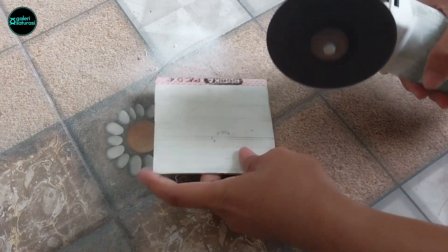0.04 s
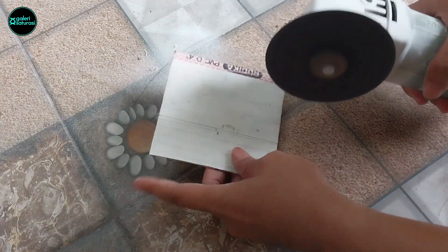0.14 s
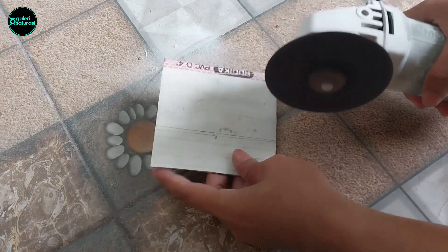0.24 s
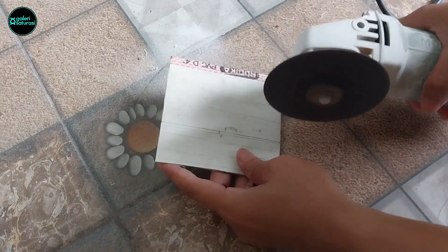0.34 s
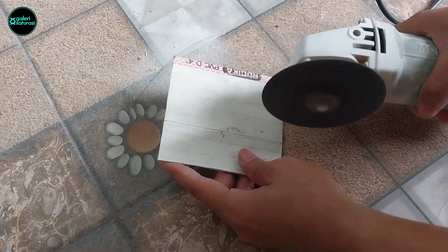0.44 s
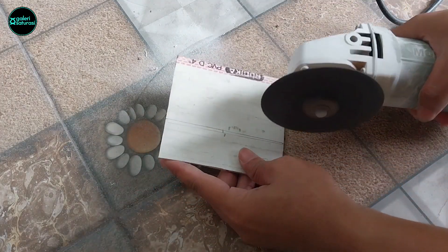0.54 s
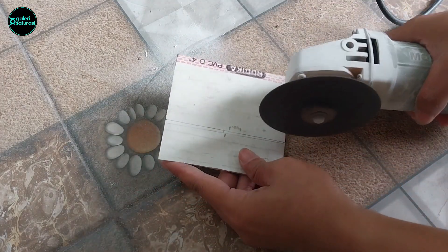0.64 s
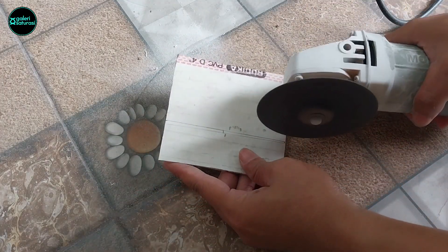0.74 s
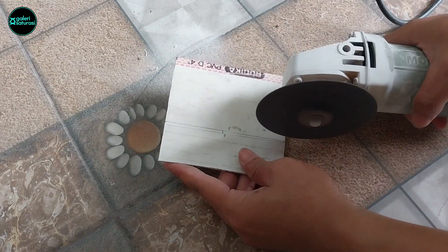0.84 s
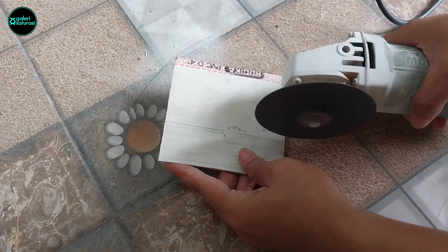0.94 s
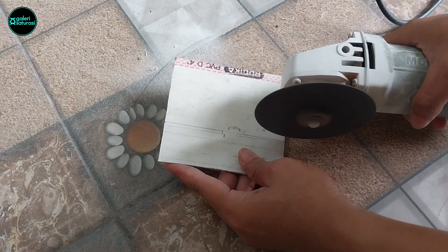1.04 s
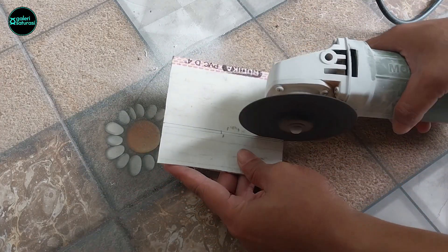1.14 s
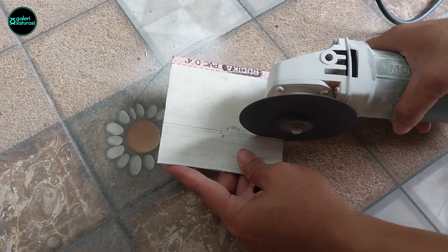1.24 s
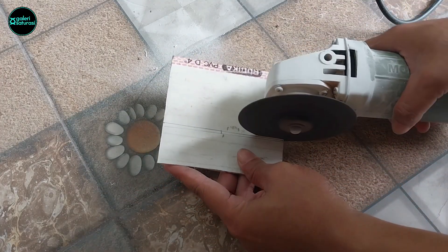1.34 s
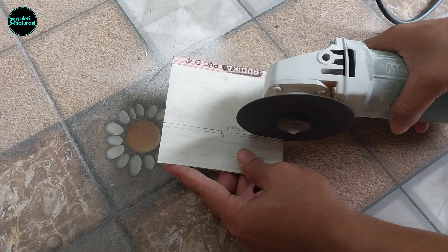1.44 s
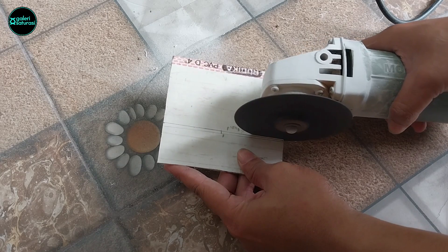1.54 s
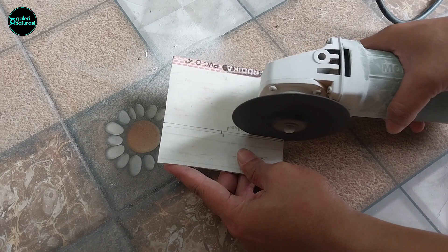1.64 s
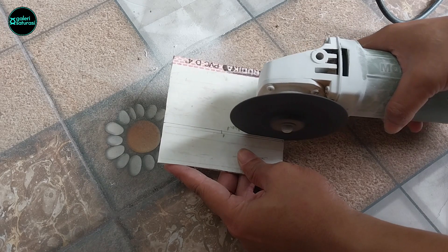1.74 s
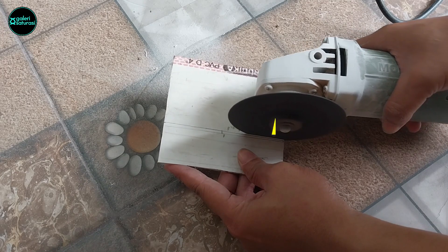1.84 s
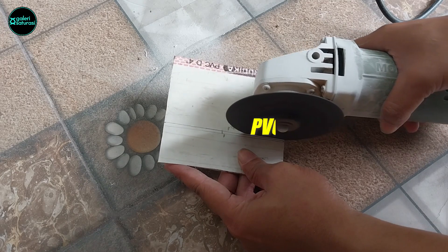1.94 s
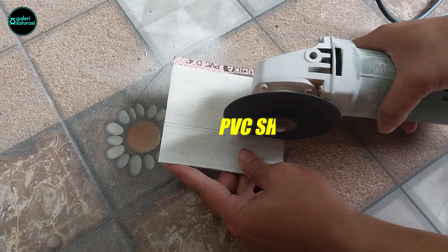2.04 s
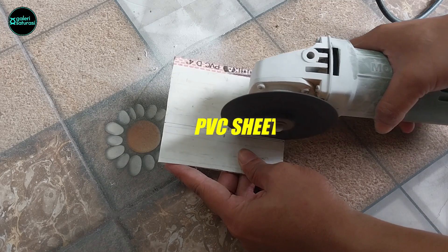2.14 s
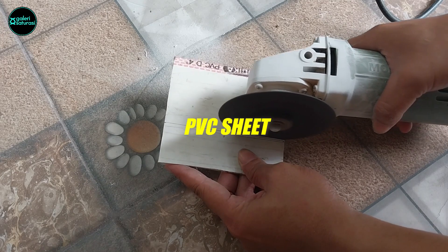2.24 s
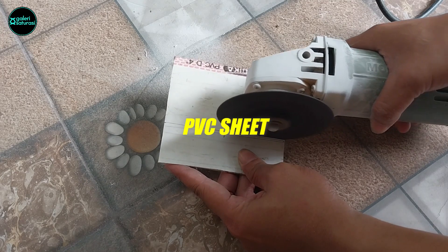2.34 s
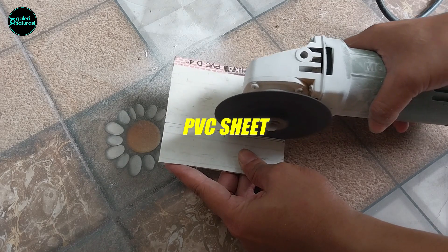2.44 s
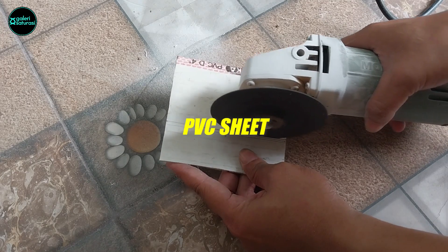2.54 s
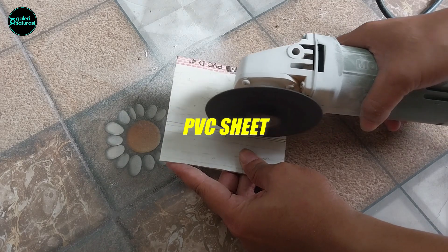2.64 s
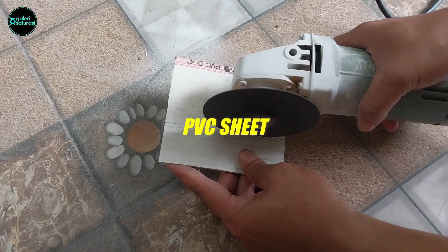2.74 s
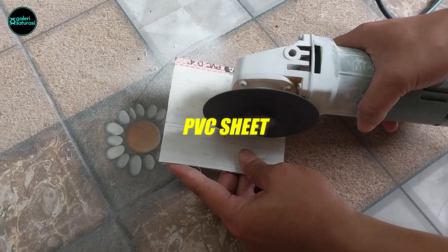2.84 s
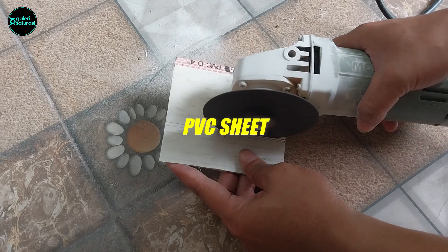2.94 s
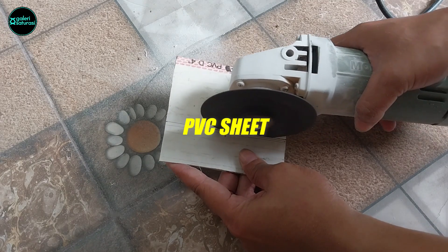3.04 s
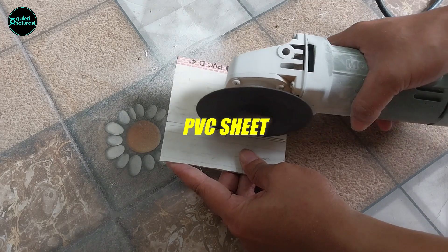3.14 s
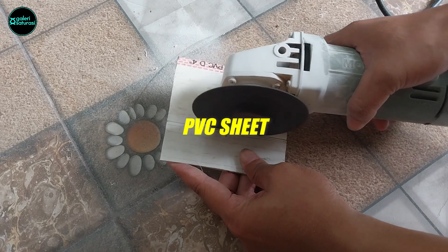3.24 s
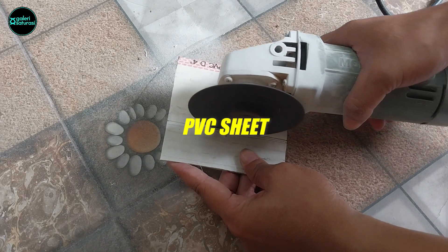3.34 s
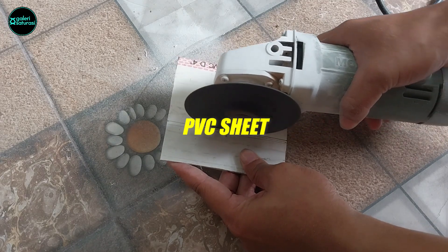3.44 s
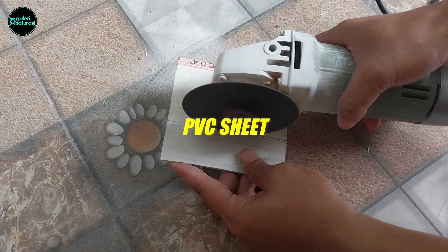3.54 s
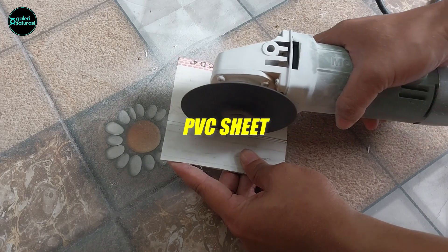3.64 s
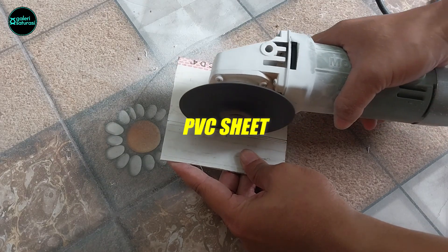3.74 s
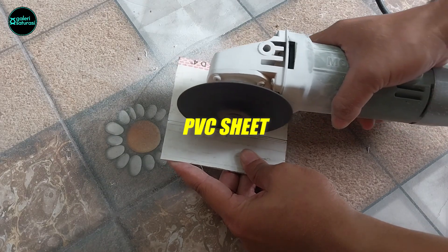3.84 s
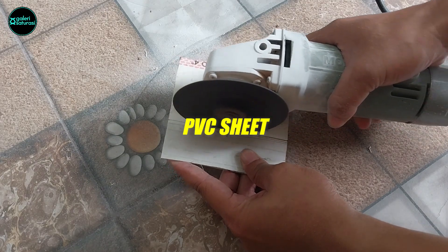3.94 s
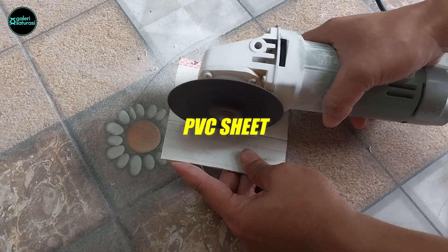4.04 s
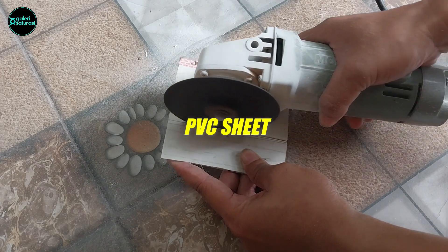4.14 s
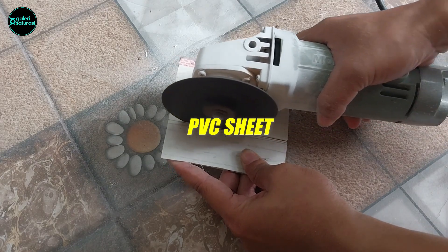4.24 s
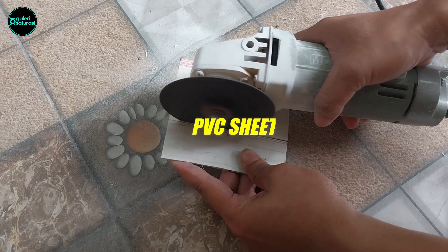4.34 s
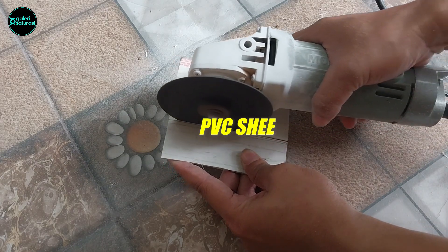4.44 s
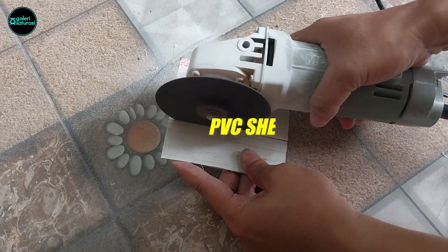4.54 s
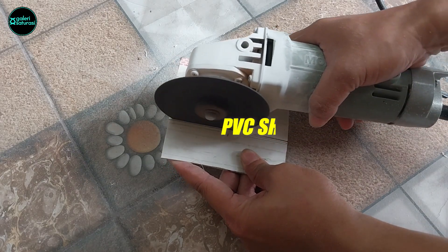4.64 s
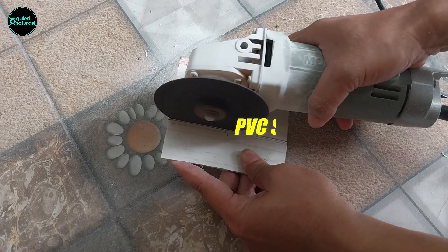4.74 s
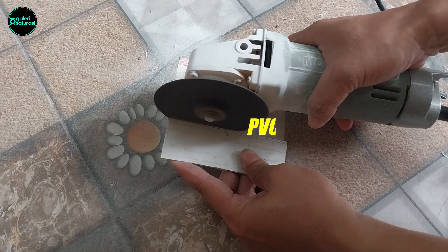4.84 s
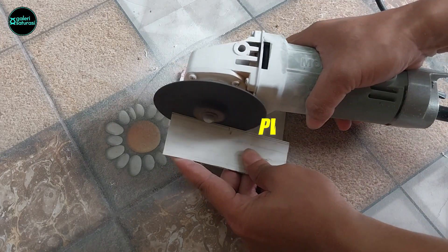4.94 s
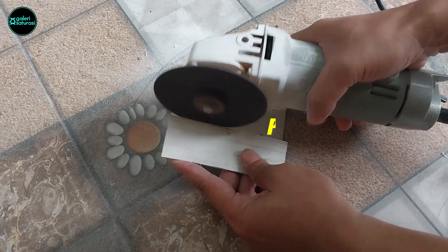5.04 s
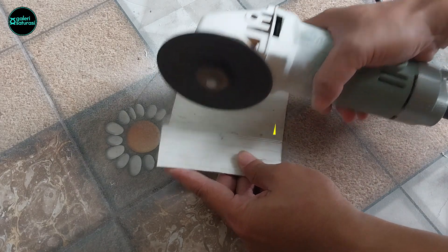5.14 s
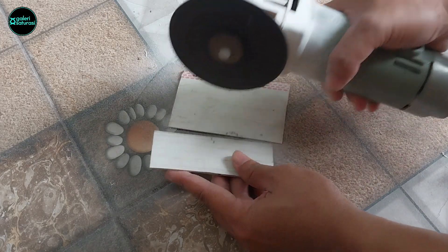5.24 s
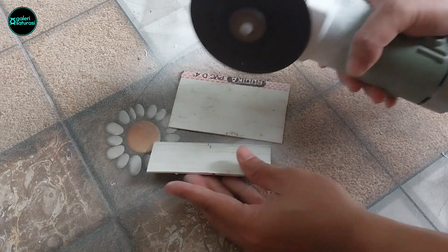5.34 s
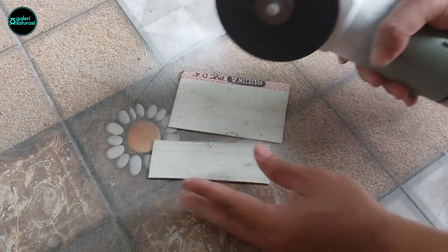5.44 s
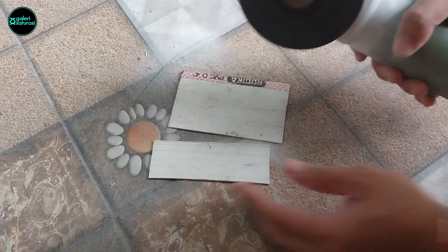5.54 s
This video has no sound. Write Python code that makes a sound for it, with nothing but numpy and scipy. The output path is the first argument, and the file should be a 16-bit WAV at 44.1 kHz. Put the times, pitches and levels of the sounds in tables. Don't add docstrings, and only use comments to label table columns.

```python
import sys
import numpy as np
from scipy import signal
from scipy.fft import rfft, irfft, next_fast_len
from scipy.io import wavfile
from scipy.ndimage import uniform_filter1d, map_coordinates

SR = 44100
rng = np.random.default_rng(int(sys.argv[2]) if len(sys.argv) > 2 else 0)


def level_to_linear(level):
    exponent = np.asarray(level, float) / 20
    return 10 ** exponent


def inscribe(sig):
    pcm = np.round(np.clip(np.atleast_2d(sig).T, -1, 1) * 32767)
    wavfile.write(sys.argv[1], SR, pcm.astype(np.int16))


N = 246519
T = np.arange(N) / SR

GEAR = 13 / 35
BITE_S, THROUGH_S, CLEAR_S = 1.1, 4.86, 5.1


def motor():
    # armature order, level in dB running up, biting, deep in the cut, lifted.
    order_lines = [(1, -38, -44, -54, -47), (2, -44, -46, -54, -48), (3, -33, -37, -44, -38.5),
                   (4, -50, -47, -45, -42), (12, -37, -43, -39, -52)]
    casing = {4: (1770, 230, -39), 12: (5630, 400, -34.5)}
    # frequency in Hz, level in dB per Hz.
    air_near = [(30, -58), (230, -15), (500, -10.5), (680, -8), (950, -5), (1200, -7), (2200, -12.5),
                (4600, -8.5), (5700, -10), (7000, -12.5), (8700, -20.5), (13000, -13), (15000, -19),
                (16500, -31)]
    # frequency in Hz, level in dB per Hz.
    air_lifted = [(30, -34), (230, -16), (900, -18), (2100, -12.5), (2450, 0.5), (3500, -25), (4200, -19),
                  (4800, -12.5), (7000, -14.5), (8500, -20), (13000, -12.5), (15000, -25), (16500, -47)]

    hz = speed()
    turns = np.cumsum(hz) / SR
    free = staged((1, 0, 0, 1))
    whine = np.zeros(N)
    for order, *stage_db in order_lines:
        gain = level_to_linear(staged(stage_db))
        if order in casing:
            centre_hz, width_hz, top_db = casing[order]
            casing_gain = level_to_linear(top_db) * peak(order * hz, centre_hz, width_hz) ** 2
            gain = (1 - free) * gain + free * casing_gain
        gain = gain * level_to_linear(2.2 * wander(14))
        phase = 2 * np.pi * order * turns + 0.12 * np.sqrt(order) * wander(30)
        whine += np.sqrt(2) * gain * np.cos(phase)

    def air_shape(hz, t):
        away = np.clip(staged((0.081, 0.39, 0.62, 0.32), t), 0, 1)
        return level_to_linear((1 - away) * read(air_near, hz) + away * read(air_lifted, hz))

    air = noise(air_shape, patchy_db=1.5)
    bright = signal.lfilter(*signal.butter(2, 3000 / SR * 2, "high"), air)
    teeth = bright * 0.32 * (bursts(110, 2.2, fade_s=0.0006) - 0.6)
    level_db = staged((-24, -26.5, -27, -29.5))
    level_db = level_db - 1.5 * np.exp(-T / 0.075)
    level_db = level_db - 2.5 * np.exp(-((T - 5.0) / 0.05) ** 2)
    return whine + level_to_linear(level_db) * (air + teeth)


def grinding():
    # centre in Hz, width in Hz, level in dB entering, level in dB leaving.
    hiss_modes = [
        [(1490, 260, 1, -7), (2210, 280, -7, 4), (3160, 950, 6, 0), (910, 700, -25.5, -45)],
        [(5280, 390, 6, -3), (4870, 240, -9, 3)],
        [(5120, 1500, 8.5, -4.5), (4550, 210, -8, -5), (3950, 980, -3, -1)],
        [(7160, 1100, -4, 5), (6530, 840, 4, -31)],
        [(12440, 1000, 4, -10), (13500, 1100, -5, 4), (14600, 690, -1, -2), (15750, 500, -1, 0),
         (9400, 4600, -2, -1.5)],
    ]
    # level in dB entering, its best moment in seconds,
    # level in dB there, level in dB leaving, share of the feed it follows.
    hiss_levels = [(-32.5, 1.8, -30, -30, 1.7), (-38.5, 2.74, -25, -33.5, .9), (-26, 2, -30, -27.5, 0.34),
                   (-27.5, 1.1, -26, -35, 0.97), (-25, 0.67, -28, -28.5, 0.1)]
    jolt_shares = (0.2, 0.9, 0.8, 0.3, 0.2)

    turns = np.cumsum(GEAR * speed()) / SR
    slaps = bursts(22, 0.31, fade_s=0.00047, locked=1.7)
    slap_strength = arch(0.84, 3.3, 3.2, 3.5)
    out = np.zeros(N)
    for modes, (*by_depth, follow), share in zip(hiss_modes, hiss_levels, jolt_shares):
        def hiss_shape(hz, t):
            depth = np.clip((t - 1.1) / 3.9, 0, 1)
            return sum(level_to_linear(a + (b - a) * depth) * peak(hz, f, w) for f, w, a, b in modes)

        hiss = noise(hiss_shape, patchy_db=1.2)
        jolt = share * slap_strength
        pulse = 1 + 0.18 * np.cos(2 * np.pi * turns) + jolt * slaps
        pulse = pulse / np.sqrt(1 + jolt + jolt ** 2)
        out += level_to_linear(arch(*by_depth)) * contact(follow) * hiss * pulse
    return out


def singing():
    # centre in Hz, width in Hz, level in dB entering, level in dB leaving.
    resonances = [(258, 160, -70, -35.5), (419, 29, -35.5, -40.5), (980, 960, -44, -42.5),
                  (1480, 194, -30, -33.5), (1707, 91, -37.5, -42), (2100, 99, -36, -29),
                  (2277, 218, -30, -30), (2638, 340, -37, -45), (4300, 1000, -44, -47),
                  (4920, 145, -31.5, -46.5), (5580, 260, -48.5, -47), (7000, 840, -42, -43),
                  (7134, 170, -31.5, -52), (7630, 350, -43, -42.5)]
    # level in dB at disc orders 1, 2, 3, ..
    rim = [-15.5, -7.5, -1.5, -10, -6, 1, -5.5, 2.5, 4, -3, 3.5, 6, 1, 4, 1, 1.5, 6.5, -12.5, 9, 0.5, 17, 0,
           0, 9.5, 10.5, 12, -20, 2.5, -1, -17, 2, -20, -15, -7, 15, 6, 20, -10, -6, -3, 11, 5, -4, 3.5, 11,
           1, -22, -1, 9.5, 2, 4, -1, -7, 7, 6, 8]

    t = T[::256]
    cut = slice(SR, 5 * SR)
    disc_hz = GEAR * speed()
    turns = np.cumsum(disc_hz)[cut] / SR
    depth = np.clip((t - 1.1) / 3.8, 0, 1)
    last_strip = np.interp(t, [4.35, 4.55], [0, 1])
    out = np.zeros(N)
    for order, rim_db in enumerate(rim, 1):
        hz = order * disc_hz[::256]
        power = sum((level_to_linear(a + (b - a) * depth) * peak(hz, f, w)) ** 2 for f, w, a, b in resonances)
        strip_db = last_strip * (2.5 * peak(hz, 2390, 160) - 5 * peak(hz, 1450, 600))
        level = np.sqrt(2 * power) * level_to_linear(strip_db + rim_db + 2.15 * wander(7, t))
        gain = np.interp(T[cut], t, level)
        phase = 2 * np.pi * (order * turns + rng.random())
        phase = phase + 0.05 * np.sqrt(order) * wander(40, T[cut])
        out[cut] += gain * np.cos(phase)
    return out * level_to_linear(-2.27) * contact(share=1.0)


def knocks():
    # start in seconds, peak level in dB.
    run_up_knocks = [
        (0.1136, -13),
        (0.1321, -12),
        (0.2014, -14),
        (0.3142, -12),
        (0.3591, -14),
        (0.4075, -12),
        (0.7327, -15),
        (1.1084, -13),
    ]
    # start in seconds, peak level in dB.
    free_knocks = [(4.8504, -11), (4.9212, -15), (4.9441, -12), (4.9601, -15), (4.9776, -11), (5.0125, -12),
                   (5.0374, -15), (5.0699, -16), (5.0988, -18), (5.1252, -15), (5.1477, -17), (5.1781, -18),
                   (5.2375, -15), (5.2609, -17), (5.2993, -16), (5.3208, -14), (5.3507, -15), (5.3876, -14),
                   (5.4171, -18), (5.4435, -16), (5.5183, -17), (5.5493, -20), (5.5692, -16)]

    out = np.zeros(N + 900)
    t = np.arange(900) / SR
    order_12_hz = 12 * speed()

    def ring(grit, hz):
        band = [hz * 0.97 / SR * 2, hz * 1.105 / SR * 2]
        return evened(signal.lfilter(*signal.butter(1, band, "band"), grit))

    swell = (t / 0.0012) ** 2 * np.exp(2 - 2 * t / 0.0014)
    swell = swell + 0.4 * np.exp(-t / 0.0039) * (t > 0.002)
    all_knocks = list(run_up_knocks) + list(free_knocks)
    for (s, db), grit in zip(all_knocks, rng.standard_normal((len(all_knocks), 900))):
        at = round((s - 0.0005) * SR)
        if s < BITE_S:
            hz = order_12_hz[at]
        elif s < CLEAR_S:
            hz = 4900
        else:
            hz = 4250
        band = ring(grit, hz)
        band = band + (s > BITE_S) * level_to_linear(-7) * ring(grit, 6800)
        out[at:at + 900] += level_to_linear(db - 9.0) * (band + 0.5 * np.gradient(grit)) * swell
    return out[:N]


def housing():
    facing_s, half_width_s, level_db = 5.33, 0.2, -33
    ring = noise(lambda hz, t: peak(hz, 4200, 330) + 0 * t, patchy_db=0.0)
    grainy = evened(ring * (1 + 0.5 * bursts(150, 1.8, fade_s=0.00055)))
    return grainy * level_to_linear(level_db) * np.exp(-((T - facing_s) / half_width_s) ** 2)


def thuds():
    # start in seconds, peak level in dB.
    floor_knocks = [
        (4.203, -12),
        (4.359, -15),
        (4.458, -13),
        (4.803, -18),
        (4.949, -21),
    ]
    out = np.zeros(N)
    t = np.arange(4000) / SR
    ring = np.sin(2 * np.pi * 130 * t) + 1.4 * np.sin(2 * np.pi * 270 * t)
    swell = (1 - np.exp(-t / 0.005)) * np.exp(-t / 0.018)
    for s, db in floor_knocks:
        at = round(s * SR)
        out[at:at + 4000] += level_to_linear(db - 15) * ring * swell
    return out


def room(x):
    # frequency in Hz, decay by 60 dB in seconds, level in dB against the direct sound.
    room_bands = [(200, 0.11, -2), (1000, 0.48, -6), (2940, 0.8, -4.5), (6000, 0.11, 0),
                  (12000, 0.12, -0.5)]
    taps = np.zeros((2, SR // 2))
    at = np.arange(40, SR // 2 - 20, 20)
    at = at + rng.integers(0, 20, (2, len(at)))
    np.put_along_axis(taps, at, rng.choice([-1., 1.], at.shape), 1)
    hz, t, z = signal.stft(taps, SR, nperseg=256)
    columns = np.transpose(room_bands)
    _, t60, db = (np.interp(np.log(hz + 1), np.log(columns[0]), c)[:, None] for c in columns)
    energy = t60 * SR / 20 / (2 * np.log(1000))
    tail = signal.istft(z * level_to_linear(db - 60 * t / t60) / np.sqrt(energy), SR, nperseg=256)[1]
    return signal.fftconvolve(x[None], tail, axes=1)[:, :N]


def draught():
    grit = rng.standard_normal((2, N))
    flutter_band = signal.butter(2, [85 / SR * 2, 170 / SR * 2], "band")
    rumble_band = signal.butter(1, [35 / SR * 2, 75 / SR * 2], "band")
    flutter = evened(signal.lfilter(*flutter_band, grit))
    rumble = evened(signal.lfilter(*rumble_band, grit))
    level_db = staged((-69, -51.5, -48.5, -67)) + 2.0 * wander(12)
    return (flutter + 0.33 * rumble) * level_to_linear(level_db + [[4], [-6]])


def speed():
    # time in seconds, armature turns per second under load.
    loaded = [(1.12, 449.3), (1.24, 442.9), (1.49, 436.6), (1.73, 432.7), (1.97, 425.8), (2.22, 417.0),
              (2.46, 407.0), (2.71, 391.3), (2.95, 389.0), (3.31, 380.1), (3.44, 378.4), (3.92, 377.2),
              (4.05, 373.2), (4.29, 373.6), (4.41, 371.4), (4.66, 373.8), (4.78, 377.2), (4.9, 383.7)]
    free_hz, start_hz, run_up_s, recover_s = 501.3, 451.6, 0.823, 0.725
    last_s, last_hz = loaded[-1]
    up = free_hz - (free_hz - start_hz) * np.exp(-T / run_up_s)
    back = free_hz - (free_hz - last_hz) * np.exp((last_s - T) / recover_s)
    return np.where(T < BITE_S + 0.01, up, np.where(T < last_s, curve(loaded), back))


def contact(share):
    # time in seconds, the hand's feed in dB.
    pressure = [(1.1, -2.5), (1.5, -2), (2, -0.5), (2.4, 1), (2.62, 0), (2.75, 1), (3.1, 0.5), (4, 0),
                (4.86, -1)]
    rise_s, release_db_per_s, off_s = 0.02, -150, 4.99
    feed_db = curve(pressure) + release_db_per_s * np.maximum(T - THROUGH_S, 0)
    touching = np.clip(np.minimum(T - BITE_S, off_s - T) / rise_s, 0, 1)
    return level_to_linear(share * feed_db) * touching


def staged(values, t=T):
    times = [BITE_S, BITE_S + 0.02, 2.0, 3.0, THROUGH_S, CLEAR_S]
    return np.interp(t, times, np.take(values, [0, 1, 1, 2, 2, 3]))


def arch(enter, best_s, best, leave):
    return np.interp(T, [BITE_S, best_s, THROUGH_S], [enter, best, leave])


def bursts(per_s, spread_db, fade_s, locked=0.):
    mains_per_s = 100
    hits = 1. * (rng.random(N) < per_s / SR)
    ripple = np.arange(1, N / SR * mains_per_s - 1)
    ripple = ripple + 0.18 * rng.standard_normal(len(ripple))
    hits[(ripple / mains_per_s * SR).astype(int)] += locked
    size = level_to_linear(spread_db * np.minimum(rng.exponential(1, N), 3)) * hits
    t = np.arange(600) / SR
    swell = (t / fade_s) ** 3 * np.exp(-t / fade_s)
    return evened(signal.oaconvolve(size, swell)[:N])


def noise(shape, patchy_db):
    # centre in Hz, width in Hz, level in dB.
    hollows = [(3450, 750, -11), (6150, 350, -4), (8600, 1000, -6), (11000, 500, -5)]
    hz = np.fft.rfftfreq(512, 1 / SR)[:, None]
    t = np.arange(N // 256 + 4) * 256 / SR
    a, b, patches = rng.standard_normal((len(t), len(hz), 3)).T
    patches = evened(uniform_filter1d(uniform_filter1d(patches, 6, 0), 12, 1))
    low = staged((0, 0.1, 1, 0), t)
    gain = shape(hz, t) * level_to_linear(low * sum(db * peak(hz, f, w) for f, w, db in hollows))
    gain = gain / np.sqrt((gain ** 2).mean(0))
    spectra = (a + 1j * b) * gain * level_to_linear(patchy_db * patches)
    return evened(signal.istft(spectra, window="cosine", nperseg=512, noverlap=256)[1][:N])


def wander(per_s, t=T):
    knots = rng.standard_normal(int(N / SR * per_s) + 3)
    drift = evened(map_coordinates(knots, [T[::128] * per_s], order=2))
    return np.interp(t, T[::128], drift)


def peak(hz, centre_hz, width):
    return 1 / np.sqrt(1 + (2 * (hz - centre_hz) / width) ** 4)


def read(points, hz):
    f, value = np.transpose(points)
    return np.interp(np.log(hz + 1), np.log(f + 1), value)


def curve(rows, t=T, axis=1):
    return np.interp(t, [r[0] for r in rows], [r[axis] for r in rows])


def evened(x):
    return x / np.sqrt(np.mean(x ** 2) + 1e-20)


def scene():
    # time in seconds, samples the left hears later.
    lag = [(0, 4.5), (1.0, 4.0), (1.5, 0), (2.6, -.5), (4.2, -3), (4.8, 0), (5.59, 1)]
    tool = motor() + housing() + knocks() + singing() + grinding() + thuds()
    size = next_fast_len(N, True)
    hz = np.fft.rfftfreq(size, 1 / SR)
    late = -1j * np.pi * hz / SR / np.sqrt(1 + (hz / 2500) ** 2)
    slope = irfft(rfft(tool, size) * late, size)[:N]
    front_room, side_room = room(tool)
    mid = tool + level_to_linear(-11) * front_room
    side = curve(lag) * slope + side_room
    return np.array([mid + side, mid - side]) * level_to_linear([[-0.7], [0.7]]) + draught()


def roll_off(x):
    return signal.sosfilt(signal.butter(12, 16000, fs=SR, output="sos"), x)


def record(dry):
    rounded = 1.2 * np.tanh(dry / 1.2)
    band_limit = signal.firwin(801, 15850, window=("kaiser", 9), fs=SR)
    limited = signal.oaconvolve(rounded, band_limit[None], "same")
    return roll_off(limited)


dry = scene()
out = record(dry)
inscribe(out)
```